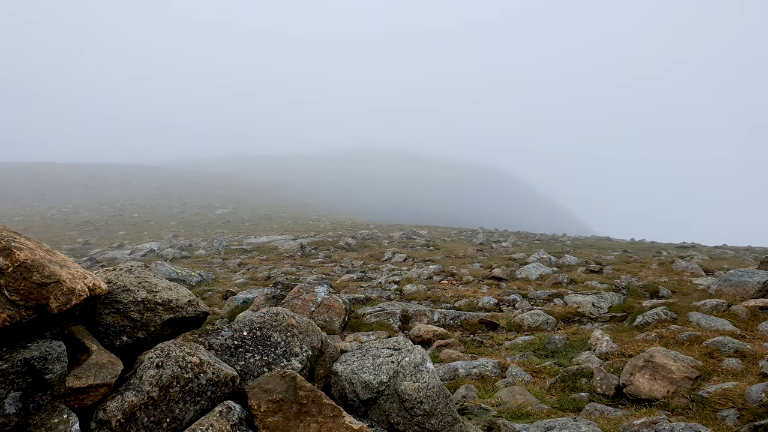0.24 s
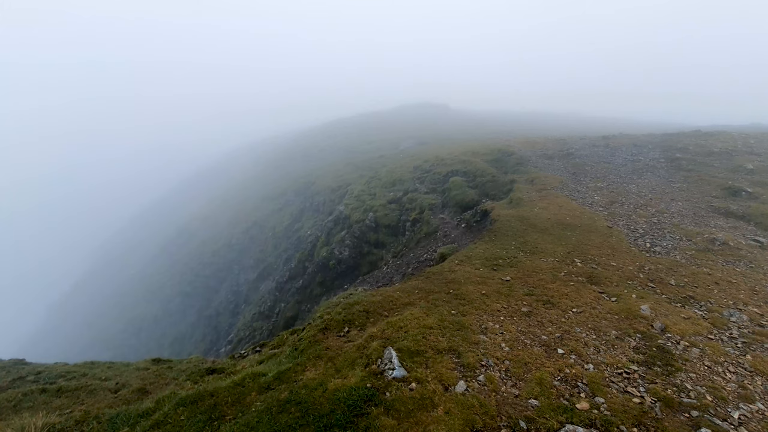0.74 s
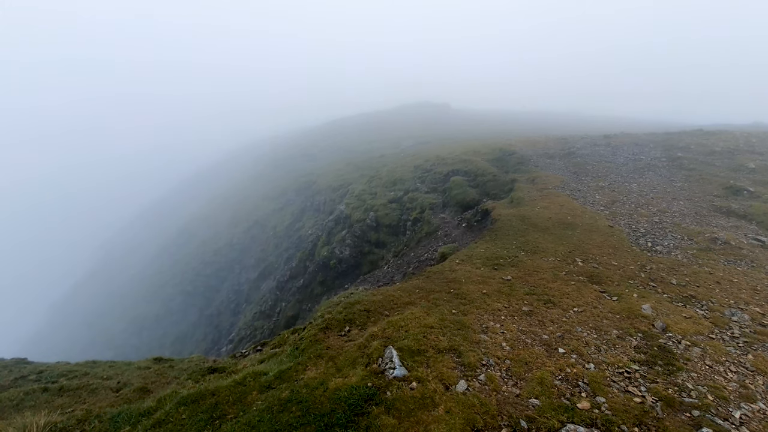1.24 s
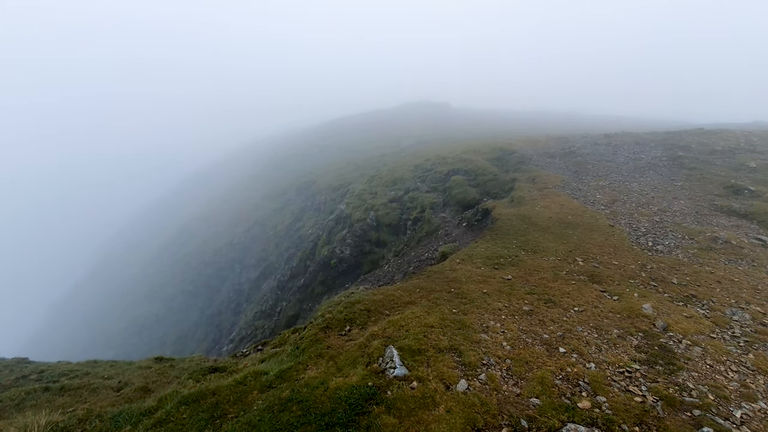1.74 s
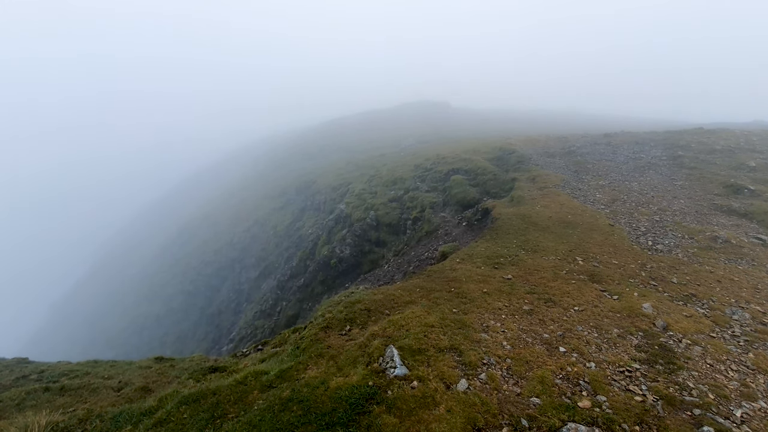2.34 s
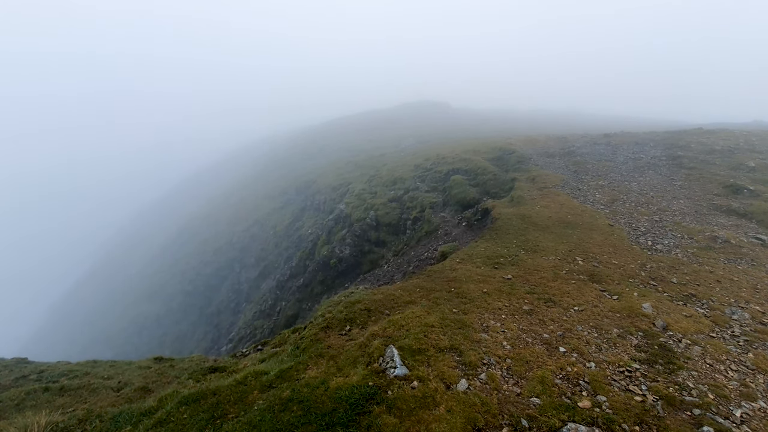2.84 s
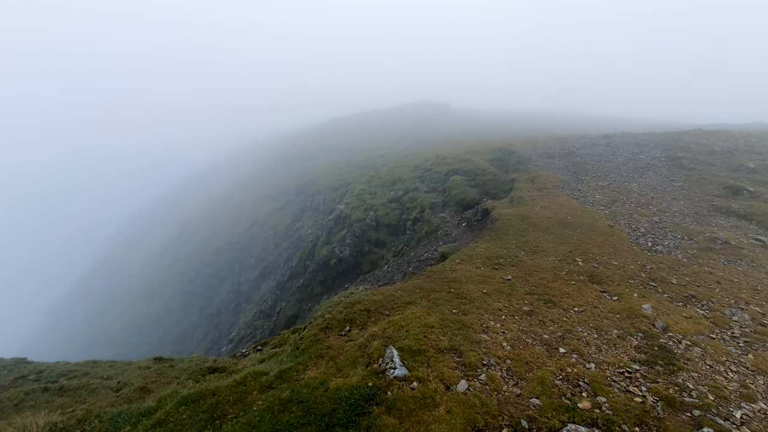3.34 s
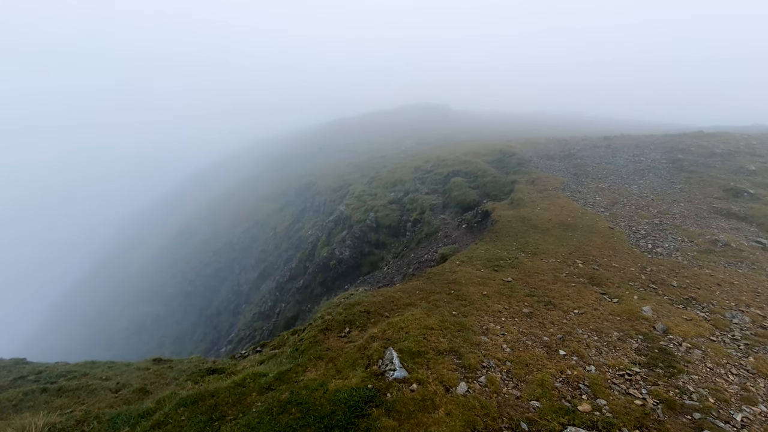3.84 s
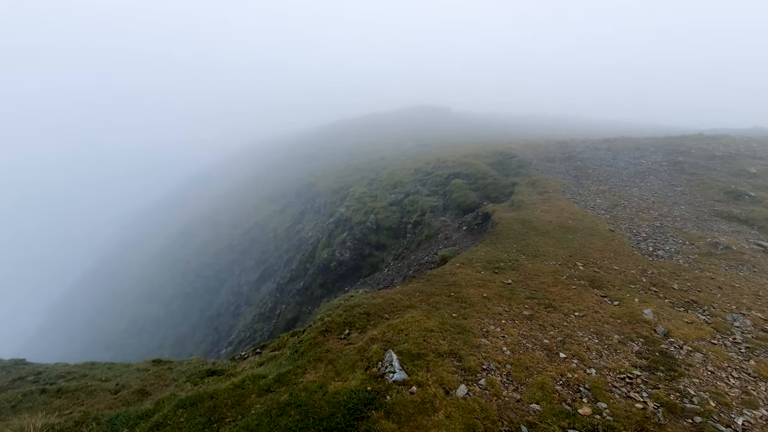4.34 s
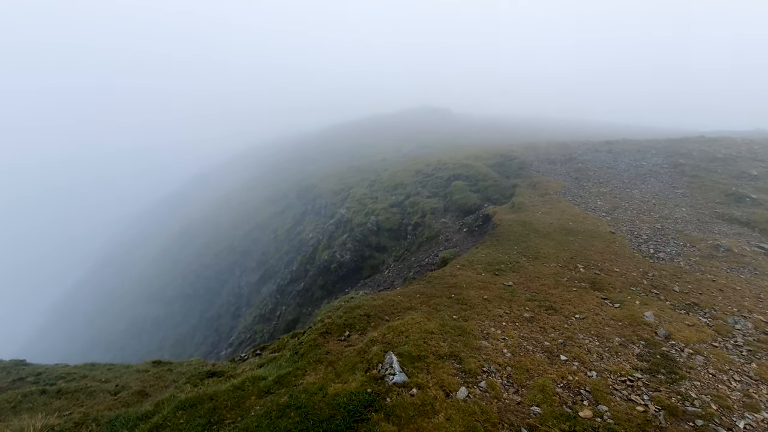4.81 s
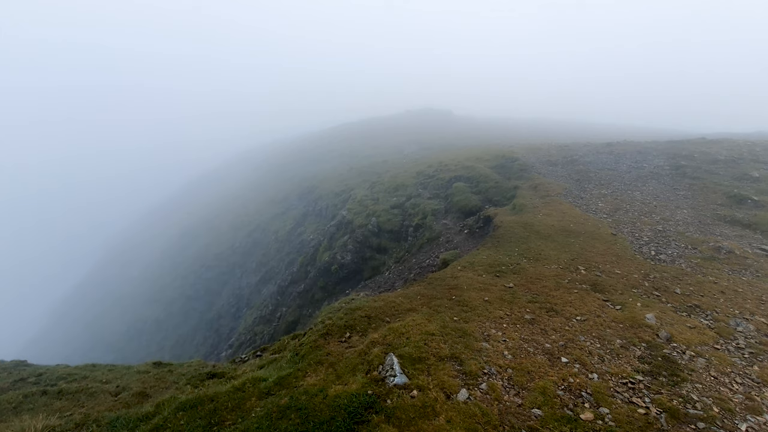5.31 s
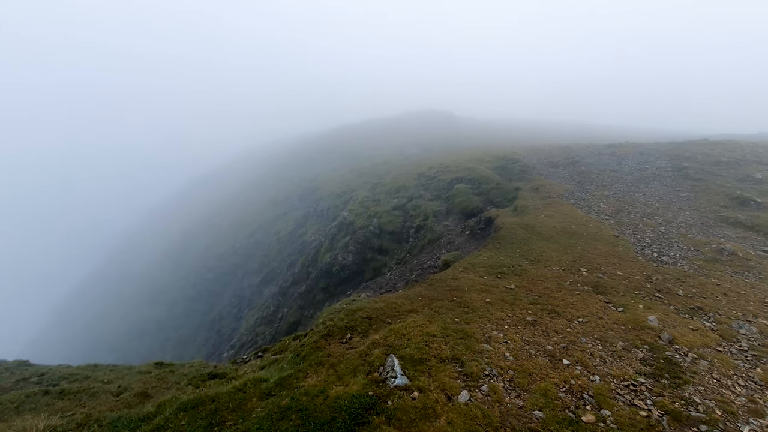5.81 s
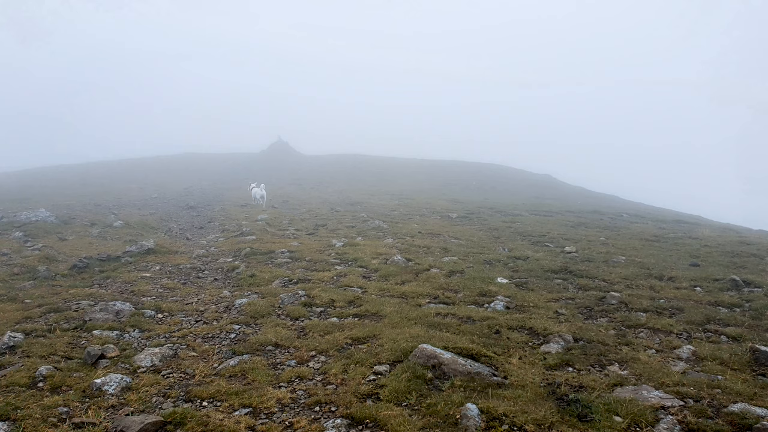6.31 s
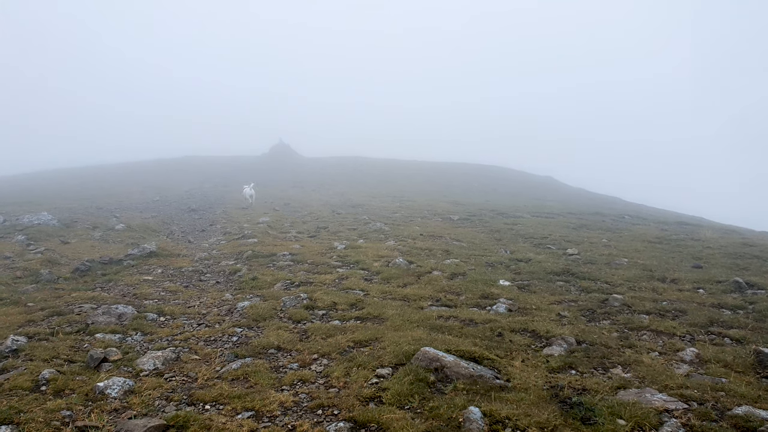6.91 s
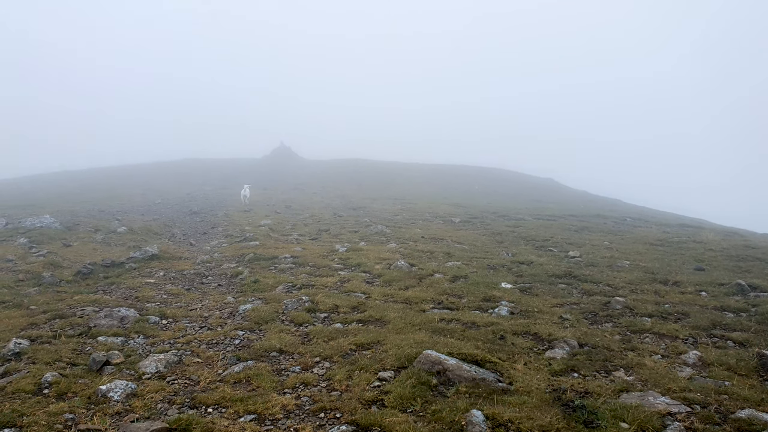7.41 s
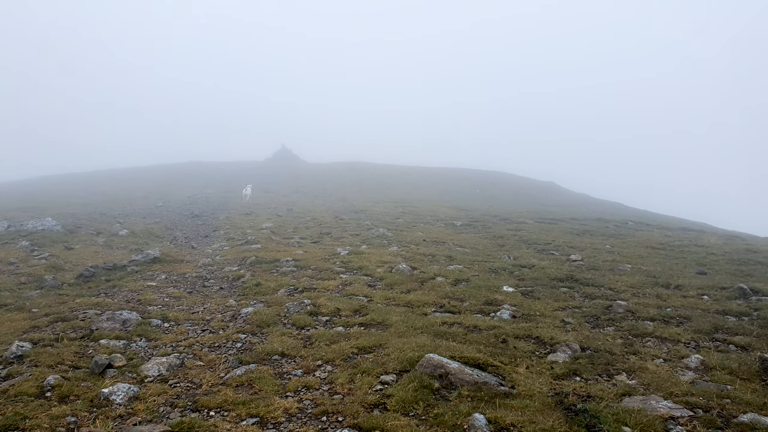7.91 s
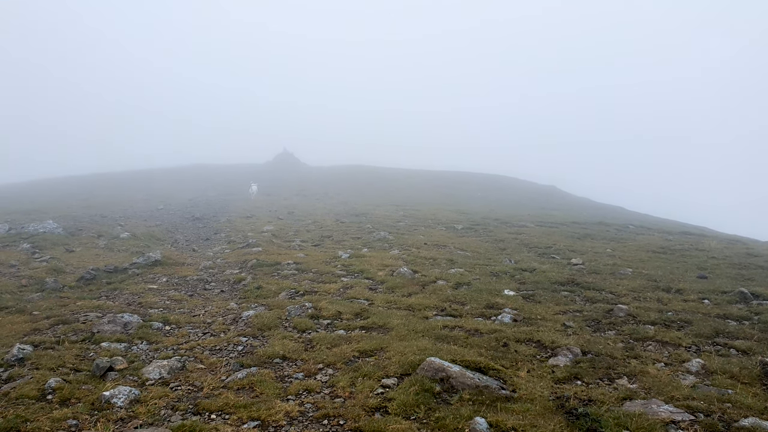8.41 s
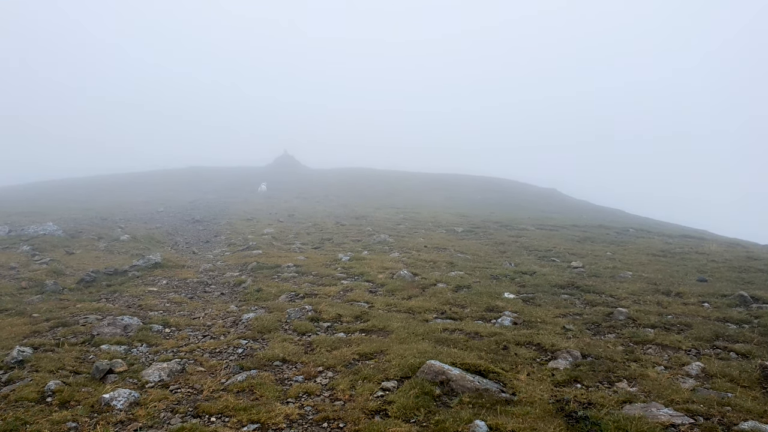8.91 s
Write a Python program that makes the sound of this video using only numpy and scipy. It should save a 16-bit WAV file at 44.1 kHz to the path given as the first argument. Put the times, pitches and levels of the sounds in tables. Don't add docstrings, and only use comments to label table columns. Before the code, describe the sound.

Strong wind buffets a small microphone on a bare mountain top, a lumpy low rumble jumping to a heavy, thumping roar, then easing somewhat.

```python
import sys
import numpy as np
from scipy import signal
from scipy.fft import rfft, irfft, next_fast_len
from scipy.io import wavfile
from scipy.ndimage import uniform_filter1d

SR = 44100
rng = np.random.default_rng(int(sys.argv[2]) if len(sys.argv) > 2 else 0)


def digitize_waveform(pressure):
    field = np.atleast_2d(pressure).T
    bounded = np.clip(field, -1, 1)
    quanta = np.round(bounded * 32767).astype(np.int16)
    wavfile.write(sys.argv[1], SR, quanta)


def how_loud(loudness_db):
    steps = np.asarray(loudness_db, float) / 20
    return 10 ** steps


N = 403515


def rms_one(x):
    return x / np.sqrt(np.mean(x ** 2) + 1e-20)


def at_hz(points, hz, axis=1):
    points = np.array(points, float)
    return np.interp(np.log(hz), np.log(points[:, 0]), points[:, axis])


def drift(per_s, size):
    r = np.exp(-2 * np.pi * per_s / SR)
    run_in = 9000
    noise = rng.standard_normal(size + run_in)
    return rms_one(signal.lfilter([1], [1, -2 * r, r * r], noise)[run_in:])


def bumps(rows, t, axis=1, tail=1, edge=2):
    at = np.arange(0, N / SR, .002)
    total_db = 0
    for row in rows:
        stretch = np.where(at > row[0], tail, 1)
        away = np.abs((at - row[0]) / row[2] / stretch)
        total_db = total_db + row[axis] * np.exp(-away ** edge)
    return np.interp(t, at, total_db)


# f/Hz, level/dB (per Hz)
RUSH_COLOUR = [(60, 3.5), (300, 11), (1200, -5), (1600, -4), (3300, -26.5), (4500, -27.5), (6500, -36),
               (10000, -37), (15700, -58.5)]


def rush():
    hz = np.maximum(np.fft.rfftfreq(N, 1 / SR), 1)
    spectrum = rfft(rng.standard_normal(N)) * how_loud(at_hz(RUSH_COLOUR, hz))
    return how_loud(-43.5) * rms_one(irfft(spectrum, N))


# t/s, level/dB (peak)
PUSHES = [(1.954, 1), (2.224, -2), (2.272, 1), (2.693, -5), (2.95, 1), (4.988, -13), (5.591, 1), (6.572, 2),
          (7.54, -16), (8.209, -9), (8.47, -0.5)]
PUSH_HZ, PUSH_T60_S, PUSH_DB = 65.6, 0.065, -6.5


def pushes():
    blows = np.full(N, 1e-18)
    for at, db in PUSHES:
        blows[round(at * SR)] = how_loud(db + PUSH_DB)
    r = how_loud(-60 / (PUSH_T60_S * SR))
    w = 2 * np.pi * PUSH_HZ / SR
    ring = signal.lfilter([0, np.sin(w)], [1, -2 * r * np.cos(w), r * r], blows)
    return signal.sosfilt(signal.butter(2, 220, fs=SR, output="sos"), ring)


# t/s, level/dB (rise), half length/s
SURGES = [(0.319, 3, 0.072), (0.798, 3.5, 0.054), (1.008, 4.5, 0.077), (1.537, 4.5, 0.15),
          (1.741, 2.5, 0.03), (2.449, 2.3, 0.087), (2.7, 2.5, 0.029), (2.948, 4.5, 0.039),
          (3.26, 1.5, 0.026), (3.382, 2.9, 0.034), (3.991, 4, 0.024), (4.111, 6.5, 0.036),
          (4.719, 4, 0.025), (4.855, 2.5, 0.03), (5.014, 3.9, 0.063), (5.622, 3, 0.03), (5.717, 3, 0.015),
          (6.276, 3, 0.021), (6.4, 5, 0.02), (6.625, 4.9, 0.047), (6.9, 2.5, 0.021), (7.229, 2.7, 0.11),
          (7.55, 3, 0.064), (7.787, 3.5, 0.015), (7.912, 6, 0.011), (8.206, 5.5, 0.012),
          (8.301, 6.5, 0.015), (8.42, -1, 0.02), (8.78, 1, 0.023), (9.0, 3, 0.12)]
# t/s, level/dB (change), half length/s
LULLS = [(0.6, -3.5, 0.061), (0.915, -3, 0.029), (1.143, -10, 0.045), (1.62, -3.5, 0.018),
         (1.945, -9, 0.062), (2.228, -3, 0.03), (2.589, -1.5, 0.065), (3.195, -6, 0.045),
         (3.75, -7.5, 0.049), (4.06, -7, 0.018), (4.21, -2.5, 0.045), (4.453, -4.5, 0.034),
         (4.93, -2.5, 0.025), (5.2, -1.5, 0.037), (5.293, -1.5, 0.077), (5.566, -5, 0.018),
         (5.84, -5, 0.065), (6.04, -4, 0.072), (6.36, -4, 0.03), (6.538, -3, 0.022), (6.746, -2, 0.089),
         (7.36, -1.5, 0.022), (7.687, -3, 0.066), (7.96, -3.5, 0.02), (8.03, -2, 0.035), (8.25, -3, 0.02),
         (8.35, -4, 0.02), (8.625, -7.5, 0.052), (8.7, -4.5, 0.036), (8.893, -2, 0.02)]


def gusts(speed, t):
    at, db = np.transpose(speed)
    lulls_db = bumps(LULLS, t, tail=0.91, edge=2.2)
    return np.interp(t, at, db) + bumps(SURGES, t) + lulls_db


# lowest f/Hz, highest f/Hz
LAYER_EDGES = [(30, 130), (180, 1100), (1600, 4200), (5500, 13000)]


def layer_levels(mean_db, follows, wind_db, colour, hz, size):
    calm_db = []
    for lo, hi in LAYER_EDGES:
        inside = hz[(hz > lo) & (hz < hi)]
        calm_db.append(10 * np.log10(2 * np.sum(how_loud(at_hz(colour, inside)) ** 2) / size))
    slow_db = uniform_filter1d(wind_db, round(0.4 * SR))
    felt_db = np.array([slow_db, wind_db, wind_db, wind_db])
    return np.c_[mean_db] - np.c_[calm_db] + np.c_[follows] * felt_db


# t/s, level/dB (rise)
PUFFS = [(0.954, 4.5), (1.992, 15), (3.695, 5.5), (4.74, 4.5), (4.975, 2), (6.84, 5), (7.0, 2),
         (7.11, -0.5), (7.789, 3), (7.918, 2), (8.07, 0), (8.093, 4), (8.107, 3), (8.134, 9)]


def puffs(t):
    half_s = 0.0032
    return sum(db * np.exp(-((t - at) / half_s) ** 2) for at, db in PUFFS)


# f/Hz, layer (0 buffet, 1 roar, 2 hiss, 3 sizzle)
LAYER_AT = [(90, 0), (250, 1), (1250, 1), (2100, 2), (4000, 2), (7000, 3)]
# f/Hz, shared level/dB, own level/dB
WAVER = [(179, 1.35, 1), (486, 0.56, 0.23), (2500, 1.24, 0.68), (6000, 1, 1.2), (12000, 0.74, 1.2)]
FLUTTER_RATES = [23, 203]


def small_eddies(slices, centres, level_db, puff_depth, size):
    flutter = drift(FLUTTER_RATES[0], size) + puff_depth * drift(FLUTTER_RATES[1], size)
    out = np.zeros(size)
    for centre, eddies in zip(centres, slices):
        mix = np.clip(1 - np.abs(at_hz(LAYER_AT, centre) - np.arange(4)), 0, 1)
        shared_db = at_hz(WAVER, centre, axis=1) * flutter
        own_db = at_hz(WAVER, centre, axis=2) * drift(12.4, size)
        out += eddies * how_loud(mix @ level_db + shared_db + own_db)
    return out


# t/s, level/dB (rise), half length/s, lift of upper rumble over lower level/dB
LUMPS = [(0.529, 8, 0.016, 0.5), (0.833, 4.5, 0.055, 1.0), (0.968, 5, 0.016, 2), (1.04, 4, 0.018, -4),
         (1.242, 3, 0.081, -2), (1.362, 16.5, 0.015, 1), (1.497, 6, 0.02, -1), (1.776, 8.5, 0.03, -1.0),
         (1.961, -2, 0.02, 6), (2.03, 7.5, 0.1, -4), (2.29, 2.5, 0.023, 9), (2.509, 2, 0.027, 2),
         (2.719, 4, 0.016, 4), (3.278, 1, 0.02, -10), (3.417, 0, 0.016, 5), (3.816, 2, 0.017, -5),
         (4.565, 6, 0.027, -9), (5.248, 6.5, 0.018, 6), (5.443, 5, 0.052, -1), (5.622, 10.5, 0.025, -1),
         (5.722, 6, 0.033, -7), (6.306, 4.9, 0.015, -1), (6.605, 7.5, 0.041, -3), (6.76, 3, 0.02, 4),
         (6.919, 3.5, 0.059, -3), (7.543, 9, 0.018, -9), (8.057, 2.2, 0.12, 7.5), (8.391, 3, 0.18, -3.5),
         (8.53, 5, 0.025, 3), (9.02, 1.5, 0.051, -14)]
# t/s, level/dB (change), half length/s
GAPS = [(0.384, -2, 0.045), (0.736, -3.9, 0.033), (0.91, -5, 0.015), (1.32, -1, 0.02), (1.497, -2, 0.16),
        (1.72, 0, 0.018), (1.902, -6, 0.028), (2.627, -4.5, 0.06), (2.827, -9, 0.016), (2.92, -9, 0.012),
        (3.058, -11, 0.018), (3.22, -5, 0.018), (3.63, -3.5, 0.022), (3.75, -5.5, 0.041),
        (4.02, -2.5, 0.11), (4.215, -4.9, 0.02), (4.687, -3.8, 0.031), (4.794, -8, 0.016),
        (4.92, -8.2, 0.042), (5.316, -3.2, 0.025), (5.58, -9, 0.013), (5.775, -14, 0.025),
        (6.422, -2.4, 0.15), (7.124, -3.5, 0.084), (7.463, -4, 0.045), (7.58, -8, 0.022),
        (8.18, -15, 0.017), (8.456, -3.5, 0.015), (8.626, -7.5, 0.03), (8.895, -7, 0.037)]


def large_eddies(t):
    return bumps([*LUMPS, *GAPS], t), bumps(LUMPS, t, axis=3)


def evened(x):
    swell = np.abs(signal.hilbert(x)) / np.std(x)
    return rms_one(x / (swell + 0.079) ** 0.28) * np.std(x)


def buffeting(deep, high, level_db, lift_db):
    lift = how_loud(lift_db / 2)
    return evened(deep / lift + high * lift) * how_loud(level_db)


def wind(speed, mean_db, follows, mean_lift_db, colour, puff_depth):
    begin, end = speed[0][0], speed[-1][0]
    start = max(0, round((begin - .05) * SR))
    size = next_fast_len(round((end + .05) * SR) - start)
    t = (start + np.arange(size)) / SR
    hz = np.maximum(np.fft.rfftfreq(size, 1 / SR), 1)
    turbulence = rfft(rng.standard_normal(size)) * how_loud(at_hz(colour, hz))
    centres = 45 * 2. ** np.arange(9)
    slices = []
    for k in range(9):
        share = np.interp(np.log(hz), np.log(centres), np.arange(9) == k)
        slices.append(irfft(turbulence * np.sin(share * np.pi / 2) ** 2, size))

    wind_db = gusts(speed, t)
    level_db = layer_levels(mean_db, follows, wind_db, colour, hz, size)
    lumps_db, lumps_lift_db = large_eddies(t)
    level_db[0] += lumps_db
    level_db[1:] += puffs(t)
    lift_db = mean_lift_db + 0.5 * wind_db + lumps_lift_db + 1.5 * drift(18, size)
    out = buffeting(slices[0], slices[1], level_db[0], lift_db)
    out += small_eddies(slices[2:], centres[2:], level_db, puff_depth, size)

    first, last = begin < .1, end * SR > N - 3000
    crossfade_s = 0.03
    inside_s = np.minimum(t - begin + first, end - t + last)
    fade = np.clip(.5 + inside_s / crossfade_s, 0, 1)
    heard = np.zeros(N + size)
    heard[start:start + size] = out * np.sqrt(fade)
    return heard[:N]


# f/Hz, level/dB (per Hz)
LEE_COLOUR = [(18, -34), (45, -3), (100, -6.5), (300, -22), (1050, -22), (1400, -33), (2700, -32.5),
              (3300, -37), (6000, -47), (11000, -62), (15700, -80)]
RIDGE_COLOUR = [(20, -46), (47, -4), (76, -2.5), (146, -11.5), (400, -19), (1250, -27.5), (1600, -33),
                (3200, -38), (4300, -41.5), (6600, -50), (9000, -58.5), (10000, -62), (12600, -62),
                (15600, -79)]
SUMMIT_COLOUR = [(20, -30), (46, -6), (72, -4), (150, -15), (300, -23), (650, -29.5), (1400, -34),
                 (3300, -36), (4500, -52), (5500, -56), (6400, -63.5), (9300, -70), (12000, -79),
                 (15600, -89)]
# t/s, level/dB (over the spot's mean)
SPEED = [
    [(0, -1.5), (0.25, -1.3), (0.68, 5)],
    [(0.68, 0.5), (1.1, -0.8), (1.9, -8.5), (2.2, 7), (2.9, 1.1), (3.65, 7), (4.1, -6.5), (4.9, 2.5),
     (5.6, -3.5), (6.38, 3.2)],
    [(6.38, 0.8), (7.0, 5), (7.6, -3), (8.6, -2.5), (9.15, 4)],
]
# buffet level/dB, roar level/dB, hiss level/dB, sizzle level/dB
MEAN_LEVEL = [
    [-34.5, -37, -48, -62],
    [-19, -27.5, -41.5, -54.5],
    [-20.5, -36, -45.5, -66.5],
]
# buffet/(dB/dB), roar/(dB/dB), hiss/(dB/dB), sizzle/(dB/dB)
FOLLOWS = [
    [.8, 1, 1.24, 1.4],
    [.8, 0.75, 1.01, 1.07],
    [.8, 0.81, 1.04, 1.5],
]
MEAN_LIFT = [1, -2.3, -0.8]
PUFF_DEPTH = [0.27, 0.66, 1.93]


def scene():
    colours = (LEE_COLOUR, RIDGE_COLOUR, SUMMIT_COLOUR)
    mix = rush() + pushes()
    for spot in zip(SPEED, MEAN_LEVEL, FOLLOWS, MEAN_LIFT, colours, PUFF_DEPTH):
        mix = mix + wind(*spot)
    return mix[None]


def low_pass(x):
    return signal.sosfilt(signal.butter(12, 15640, fs=SR, output="sos"), x)


def record(dry):
    low_cut = signal.butter(4, 30.3, "high", fs=SR, output="sos")
    cut = signal.sosfilt(low_cut, dry)
    overload = .95
    mix = cut / (1 + (cut / overload) ** 4) ** 0.37
    return low_pass(mix)


dry = scene()
out = record(dry)
digitize_waveform(out)
```